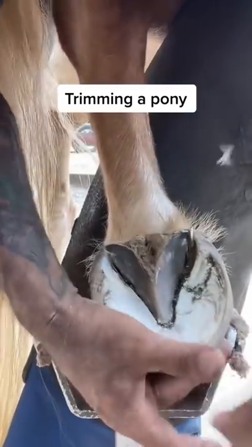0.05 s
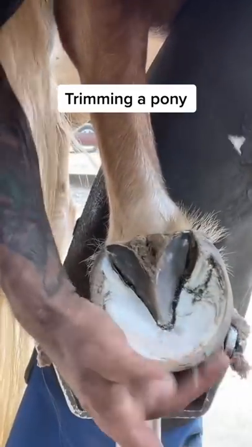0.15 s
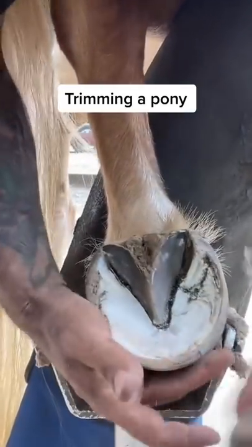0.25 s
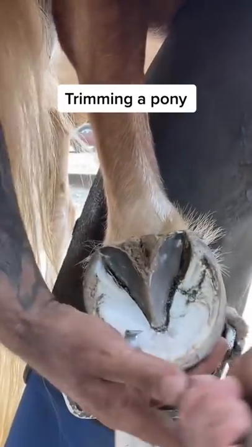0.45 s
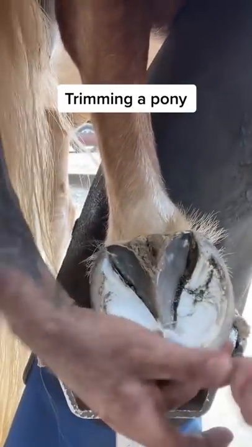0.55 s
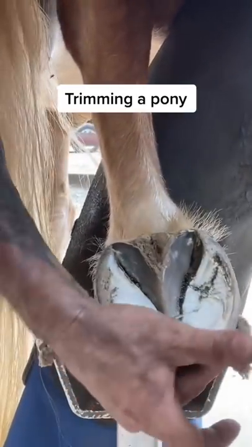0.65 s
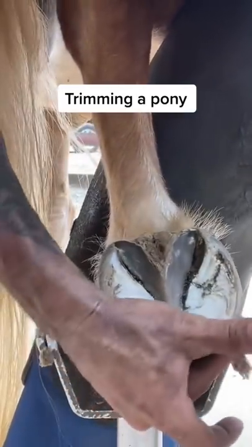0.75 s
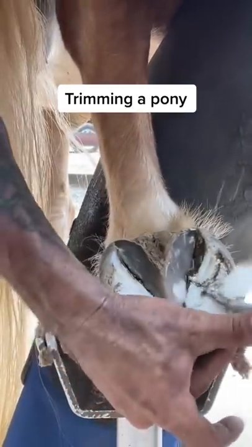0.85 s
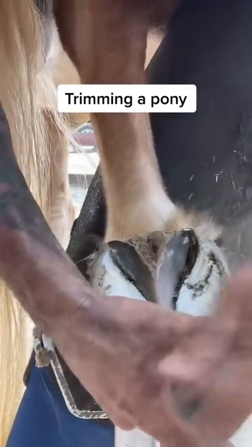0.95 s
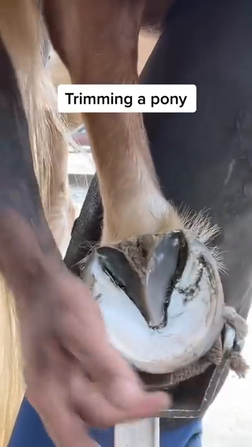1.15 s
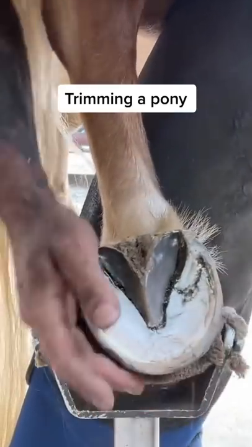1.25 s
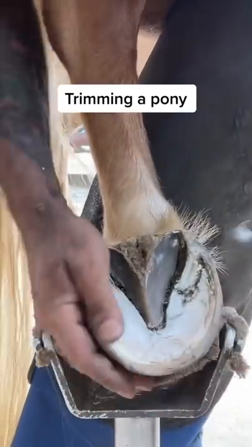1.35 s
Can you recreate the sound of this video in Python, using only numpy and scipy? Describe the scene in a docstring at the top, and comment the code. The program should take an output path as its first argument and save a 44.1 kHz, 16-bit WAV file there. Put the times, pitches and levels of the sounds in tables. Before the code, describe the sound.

Hoof trimming close to the microphone in a stable. One sharp, ringing snap of horn comes first, followed by lighter clicks, brief knife scrapes and a soft hollow knock, with dull handling bumps over a quiet machine hum.

```python
"""Paring a pony's hoof

A knife scrapes dry horn close by, in dense trains of tiny fractures. The horn cracks off once
loudly, ringing hoof and blade; two small chips click away and the blade slips with a tick.
Leg and hands bump softly, and a hand knocks the hollow hoof.
A machine hums low behind; the stable walls answer briefly."""
import sys
import numpy as np
from scipy import signal
from scipy.fft import rfft, irfft, next_fast_len
from scipy.io import wavfile
from scipy.ndimage import map_coordinates

SR = 44100
rng = np.random.default_rng(int(sys.argv[2]) if len(sys.argv) > 2 else 0)


def put_to_file(sound):
    """Save the sound as 16-bit audio at rate SR, in the file named by the first command-line argument."""
    columns = np.atleast_2d(sound).T  # one column per channel
    safe = np.clip(columns, -1, 1)
    whole_steps = np.round(safe * 32767)
    wavfile.write(sys.argv[1], SR, whole_steps.astype(np.int16))


N = 61739


def amp(db):
    return 10 ** (np.asarray(db) / 20)


def unit_rms(x):
    return x / np.sqrt(np.mean(x ** 2) + 1e-20)


def log_interp(points, hz):
    """Interpolate (frequency [Hz], value) points on a log frequency axis."""
    point_hz, values = np.transpose(points)
    return np.interp(np.log(hz + 1), np.log(point_hz + 1), values)


def since(start_s):
    """Time [s] from start_s at every sample."""
    return np.arange(N) / SR - start_s


def wobble(knots_per_s):
    """Smooth random curve."""
    knots = rng.standard_normal(int(N * knots_per_s / SR) + 4)
    return map_coordinates(knots, [np.arange(N) * knots_per_s / SR], mode="nearest")


def coloured(x, spectrum, tilt_db_per_oct=0, peaks=()):
    """Filter x by a spectrum, a tilt above 500 Hz and resonant peaks; output rms 1."""
    hz = np.fft.rfftfreq(N, 1 / SR)
    gain_db = log_interp(spectrum, hz) + tilt_db_per_oct * np.log2(np.maximum(hz, 500) / 500)
    for centre_hz, width_hz, lift_db in peaks:
        gain_db += lift_db / (1 + (2 * (hz - centre_hz) / width_hz) ** 2)
    return unit_rms(irfft(rfft(x) * amp(gain_db), N))


def fractures(rate_per_s=14000, spread_db=2.5):
    """Tiny breaks in horn: dense impulses of random sign and size."""
    breaks = rng.random(N) < rate_per_s / SR
    return breaks * rng.choice([-1, 1], N) * amp(spread_db * rng.standard_normal(N))


def burst(start_s, attack_s, hold_s, t60_s):
    """Envelope: linear attack, hold, exponential release."""
    t = since(start_s)
    release_db = -60 * np.maximum(t - attack_s - hold_s, 0) / t60_s
    return np.clip(t / attack_s, 0, 1) * amp(release_db)


def ring(start_s, modes, attack_s, rough_rad=0):
    """Struck, damped modes; rubbing contact roughens their phase."""
    t = np.maximum(since(start_s), 0)
    tones = np.zeros(N)
    for hz, db, t60_s in modes:
        decay = amp(db + rng.normal(0, 1) - 60 * t / t60_s)
        phase = 2 * np.pi * (hz * t + rng.random()) + rough_rad * wobble(knots_per_s=160)
        tones += decay * np.sin(phase)
    return tones * (1 - np.exp(-t / attack_s))


def in_stable(x, wet_db, delay_s=.006):
    """Add the walls' diffuse tail; treble dies first."""
    # wall decay (frequency [Hz], t60 [s])
    wall_t60 = [(200, .33), (950, 0.33), (2400, 0.342), (4500, 0.25), (9000, 0.2), (15000, 0.14)]
    hz, t, noise_stft = signal.stft(rng.standard_normal(SR // 2), SR, nperseg=256)
    decay = amp(-60 * t / log_interp(wall_t60, hz)[:, None])
    tail = signal.istft(noise_stft * decay, SR, nperseg=256)[1]
    tail *= np.clip(np.arange(len(tail)) / SR / delay_s - 1, 0, 1)  # gap, then fade-in
    return x + amp(wet_db) * signal.fftconvolve(x, tail / np.linalg.norm(tail))[:N]


def hum_and_air(drift_rad=.12, waver_db=.2, air_db=-47.5):
    """Slightly unsteady machine hum over the air of the stable."""
    # hum partials (frequency [Hz], rms level [dB])
    partials = [(74.9, -37), (120, -50.5), (149.8, -62.5), (225, -62)]
    # air noise (frequency [Hz], relative level [dB])
    air_spectrum = [(15, -43), (25, -32.5), (48, -17), (92, -13), (153, -19.5), (180, -24), (242, -29),
                    (301, -29.5), (545, -28.5), (624, -31), (695, -31), (988, -31.5), (1070, -36.5),
                    (1790, -39.5), (16000, -68)]
    hum = np.zeros(N)
    for hz, db in partials:
        level = amp(db + waver_db * wobble(knots_per_s=10))
        phase = 2 * np.pi * (hz * since(0) + rng.random()) + drift_rad * wobble(knots_per_s=18)
        hum += level * unit_rms(np.sin(phase))
    return hum + amp(air_db) * coloured(rng.standard_normal(N), air_spectrum)


def blade_strokes():
    """The blade scrapes harder until it slips off; rise and fall each span 20 dB."""
    # strokes (peak time [s], level [dB], rise [s], fall [s], tilt [dB/octave])
    strokes = [(.003, -36.5, 0.025, 0.055, -3), (.045, -48, .02, 0.032, 0), (.495, -52, 0.045, 0.11, 4.5),
               (0.552, -43.5, 0.028, 0.046, -1.5), (0.587, -46, 0.0064, 0.026, -1),
               (0.838, -38, 0.038, 0.033, -1), (.93, -56.5, 0.082, 0.1, 0),
               (0.962, -43.5, 0.0087, .004, -0.5), (1.226, -52, 0.025, 0.028, 4),
               (1.362, -56.5, 0.048, 0.063, 5)]
    # scrape (frequency [Hz], relative level [dB])
    spectrum = [(200, -23), (500, -15.5), (1050, -1), (1750, -8), (2300, 3), (3300, -4.5), (5000, -6.5),
                (6600, -12.5), (8800, -14.5), (11500, -35), (14500, -32), (16000, -43)]
    # scrape peaks and a dip (centre [Hz], width [Hz], gain [dB])
    peaks = [(1510, 200, 2.5), (2350, 260, -3.5), (3916, 270, 3), (4680, 190, 4.5)]
    out = np.zeros(N)
    for peak_s, db, rise_s, fall_s, tilt_db_per_oct in strokes:
        t = since(peak_s)
        envelope = amp(db - 20 * np.maximum(-t / rise_s, t / fall_s))
        out += envelope * coloured(fractures(), spectrum, tilt_db_per_oct, peaks)
    return in_stable(out, wet_db=-12.5)


def leg_bumps():
    """Leg and hands jolt softly as the load on the blade changes."""
    # jolts (time [s], level [dB])
    jolts = [(.002, -47), (0.241, -40.5), (.41, -50), (0.497, -51), (0.858, -54), (0.966, -47.5)]
    # dull thud (frequency [Hz], relative level [dB])
    spectrum = [(60, -38), (130, -12), (190, -2), (260, -8), (400, -17.5), (700, -14.5), (1500, -36.5),
                (6000, -76)]
    envelope = sum(amp(db) * burst(start_s, attack_s=.0035, hold_s=.018, t60_s=.38)
                   for start_s, db in jolts)
    return envelope * coloured(rng.standard_normal(N), spectrum)


def horn_crack(attack_s=.0012, ring_db=-21):
    """The horn gives way in a rush of fractures and leaves hoof and blade ringing."""
    # fracture rush (time [s], level [dB])
    start_s, db = (.2225, -14)
    # fracture rush (frequency [Hz], relative level [dB])
    spectrum = [(200, -31), (500, -25), (750, -12), (980, -7.5), (1200, -18.5), (1800, -14), (2350, -12),
                (3600, -13), (4100, 1), (5300, -9.5), (6050, -7.5), (6700, -4.5), (8500, -11), (9100, -19),
                (11300, -23), (12000, -18), (12600, -24), (14000, -23), (16000, -29.5)]
    # hoof wall and steel blade (frequency [Hz], relative level [dB], t60 [s])
    bright_modes = [(2310.4, -24, 0.19), (3980, 0.5, .18), (4310, -7.5, 0.17), (4255, -8.5, 0.18),
                    (4326, -2.5, .24), (5020, -5.5, .16), (6540, 0.5, 0.1694), (6770, -10, 0.13),
                    (7150, -16, 0.15)]
    # hollow hoof body (frequency [Hz], level [dB], t60 [s])
    body_modes = [(700, -36, .07), (790, -34, .1), (883, -27, .15), (984, -24.5, .16)]
    envelope = amp(db) * burst(start_s, attack_s, hold_s=.004, t60_s=.11)
    rush = envelope * coloured(fractures(), spectrum)
    bright = amp(ring_db) * ring(start_s, bright_modes, attack_s, rough_rad=1)
    rush = in_stable(rush, wet_db=-6)
    body = ring(start_s, body_modes, attack_s=.004, rough_rad=.6)
    return rush + bright + body


def horn_chips(echo_s=.009, echo_db=-13):
    """Each chip snaps off, echoes from a near wall and briefly rings the hoof."""
    # chips (time [s], level [dB], attack [s], hold [s], t60 [s], ring gain [dB], wet gain [dB])
    chips = [(.4037, -21, .0005, 0.0022, 0.033, -7, -10), (.9622, -25.5, .0015, 0.0026, 0.011, 0, -13)]
    # one spectrum per chip (frequency [Hz], relative level [dB])
    spectra = [
        [(240, -38), (400, -13.5), (867, -17.5), (1210, -6.5), (1910, -9), (2790, -4.5), (3100, -4), (3830, -3),
         (4330, -7), (5030, 2.5), (5950, -17.5), (6920, -9), (8430, -17.5), (10600, -47), (15000, -53)],
        [(300, -11), (750, -17), (1250, -2), (1700, -16), (2400, -5), (3400, -10), (4000, -2), (4900, -4),
         (5500, -16), (8300, -16), (9200, -24), (11500, -35), (15500, -43)],
    ]
    # hoof under a chip (frequency [Hz], relative level [dB], t60 [s])
    hoof_modes = [(1177, 3.5, .028), (1290, -9, .028), (2730, -11, 0.025), (3770, 6, 0.019),
                  (4700, -7, 0.014)]
    out = np.zeros(N)
    for (start_s, db, attack_s, hold_s, t60_s, ring_db, wet_db), spectrum in zip(chips, spectra):
        snap = burst(start_s, attack_s, hold_s, t60_s) * coloured(fractures(), spectrum)
        echo = amp(echo_db) * np.interp(since(echo_s), since(0), snap)
        snap = in_stable(snap, wet_db)
        hoof = amp(ring_db) * ring(start_s, hoof_modes, attack_s)
        out += amp(db) * (snap + echo + hoof)
    return out


def blade_slips(attack_s=.001, ring_db=-3):
    """The blade comes free with a tick and rings briefly."""
    # slips (time [s], level [dB])
    slips = [(0.8331, -37.5), (.8405, -44), (0.968, -36.5)]
    # tick (frequency [Hz], relative level [dB])
    spectrum = [(500, -1), (1700, -8), (2400, 6), (3300, -7), (5050, 6), (6500, -11), (9000, -15),
                (11500, -30), (14500, -26), (16000, -35)]
    # steel blade (frequency [Hz], relative level [dB], t60 [s])
    blade_modes = [(2110, -8, 0.12), (2357, 1.5, 0.17), (2356, -11, 0.16), (3960, 3.5, 0.034),
                   (4440, -14, .19), (4724, -5.5, .19), (5050, 2.5, 0.048)]
    out = np.zeros(N)
    for start_s, db in slips:
        tick = burst(start_s, attack_s, hold_s=.0007, t60_s=.025) * coloured(fractures(), spectrum)
        tick = in_stable(tick, wet_db=-6)
        blade = amp(ring_db) * ring(start_s, blade_modes, attack_s, rough_rad=1.7)
        out += amp(db) * (tick + blade)
    return out


def hand_knock():
    """Soft hand contacts ring the hoof's low, hollow modes."""
    # contacts (time [s], level [dB])
    contacts = [(1.2205, -34), (1.2275, -31.5)]
    # hollow hoof (frequency [Hz], relative level [dB], t60 [s])
    hoof_modes = [(424, -0.5, 0.039), (625, 0, 0.095), (674, 2.5, 0.11), (826, 3, 0.082), (893, 4.5, 0.097),
                  (1110, -4, 0.046), (1290, 6, 0.024), (1800, -7, 0.03)]
    knock = sum(amp(db) * ring(start_s, hoof_modes, attack_s=.0043) for start_s, db in contacts)
    return in_stable(knock, wet_db=-17.5)


def scene():
    """Mono sum of all sources."""
    paring = horn_crack() + horn_chips() + blade_strokes() + blade_slips()
    handling = hand_knock() + leg_bumps()
    return (paring + handling + hum_and_air())[None]


def record(dry):
    """Soft peak limiter, then low-pass."""
    ceiling, stop_hz, edge_hz = .6, 16200, 700
    limited = dry / (1 + np.abs(dry / ceiling) ** 6) ** (1 / 6)
    size = next_fast_len(N + SR // 2)
    edge = np.clip((stop_hz - np.fft.rfftfreq(size, 1 / SR)) / edge_hz, 0, 1)
    low_pass = np.sin(np.pi / 2 * edge) ** 2
    return irfft(rfft(limited, size) * low_pass, size)[:, :N]


dry = scene()
out = record(dry)
put_to_file(out)
```